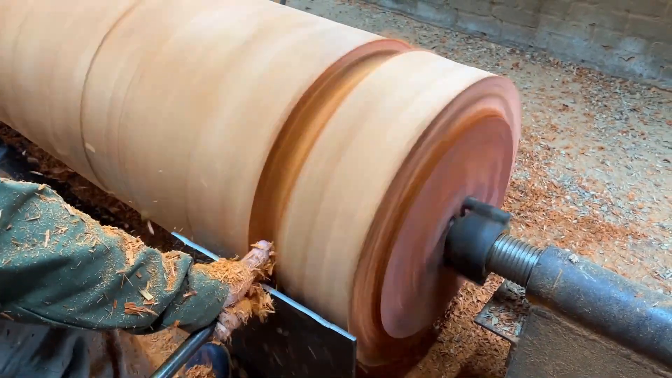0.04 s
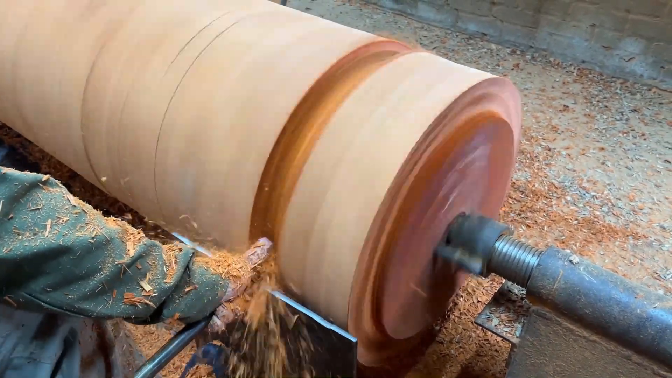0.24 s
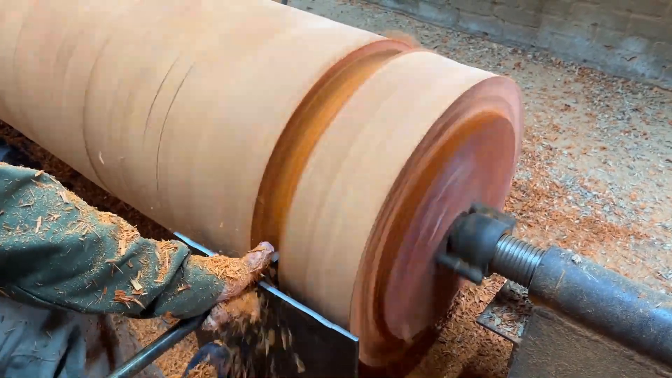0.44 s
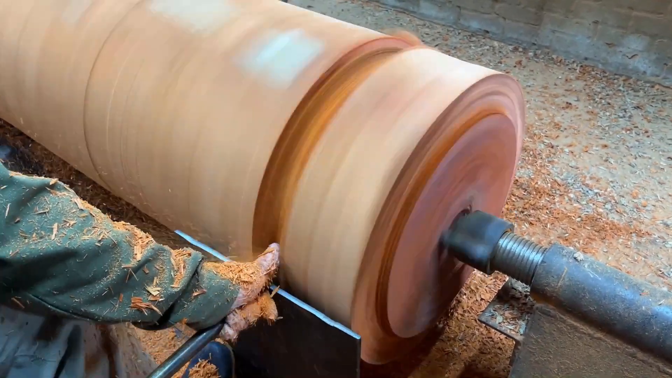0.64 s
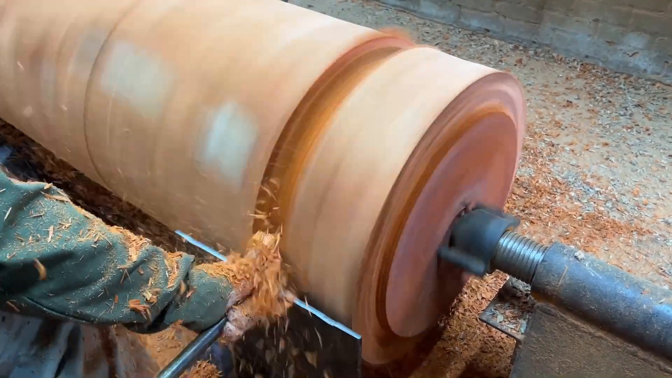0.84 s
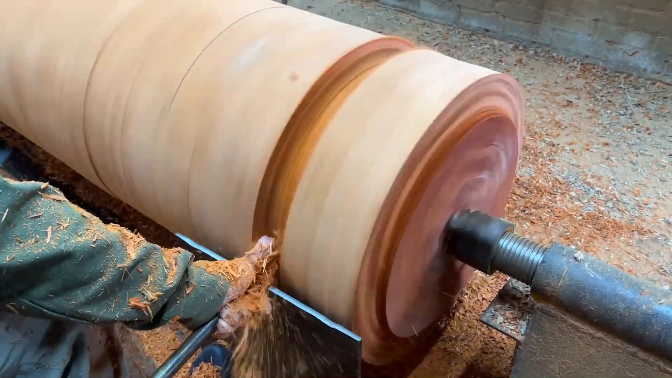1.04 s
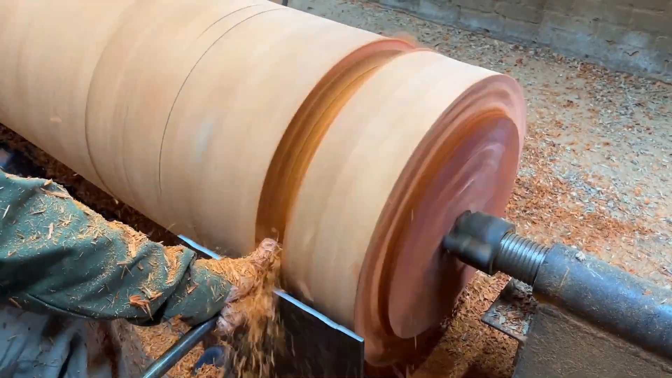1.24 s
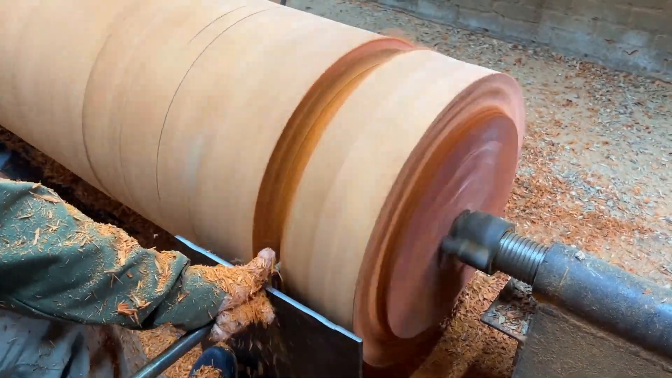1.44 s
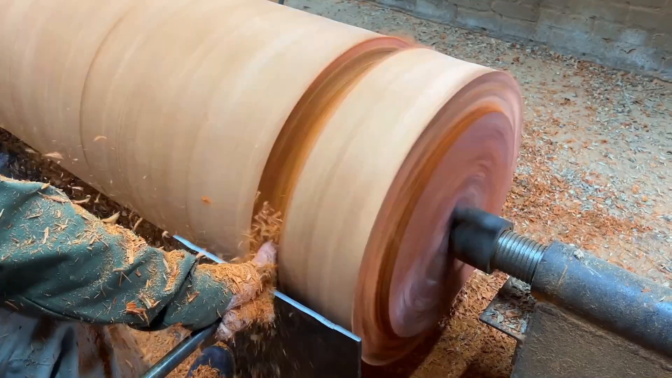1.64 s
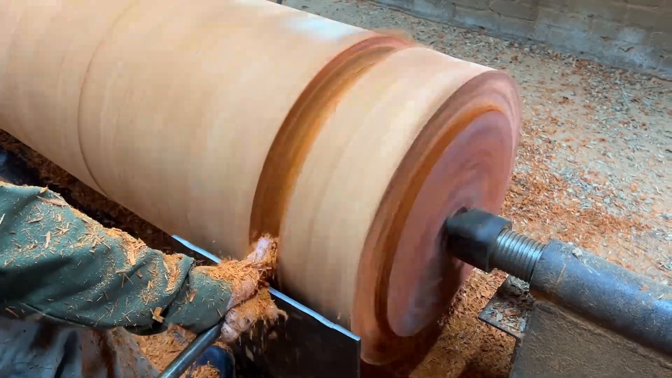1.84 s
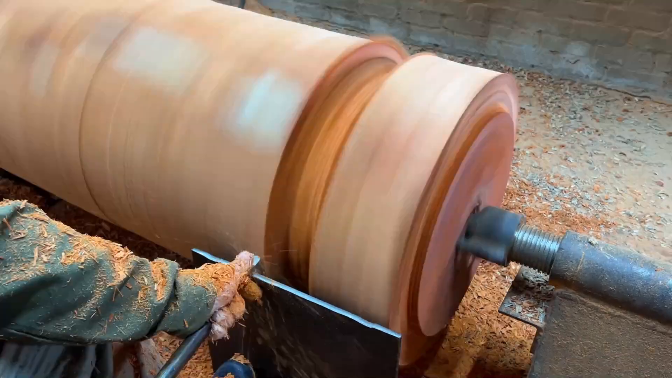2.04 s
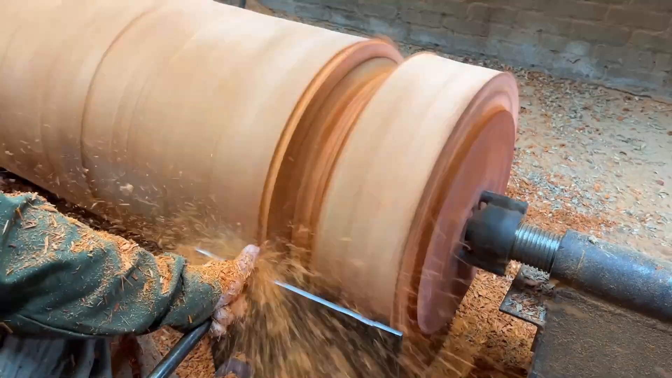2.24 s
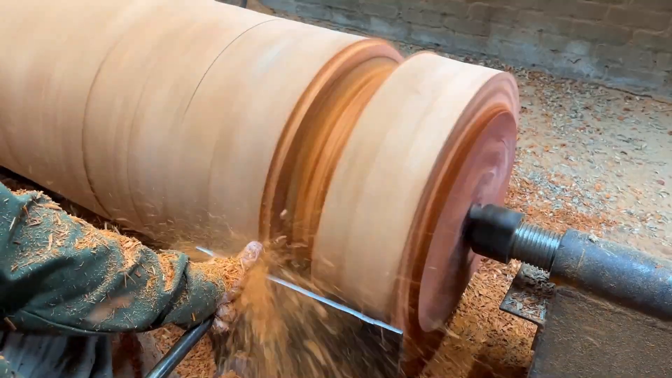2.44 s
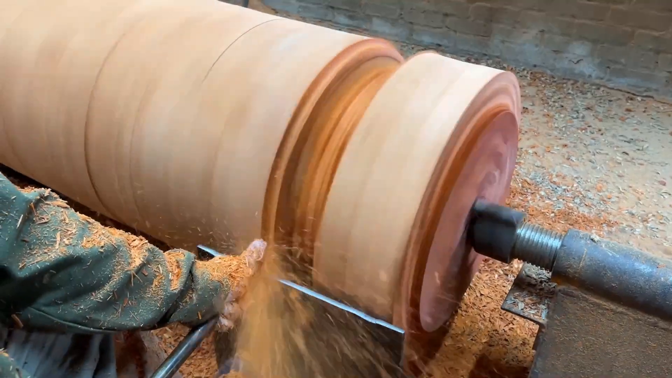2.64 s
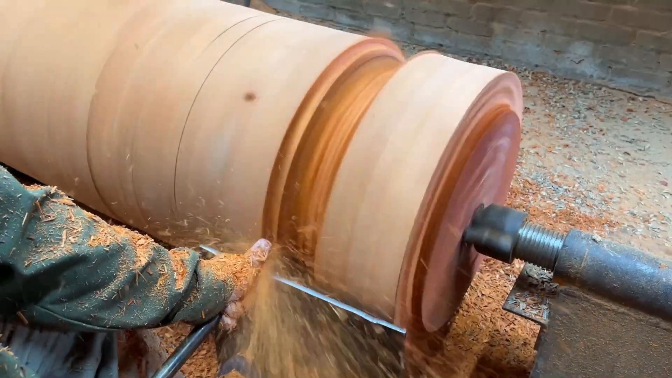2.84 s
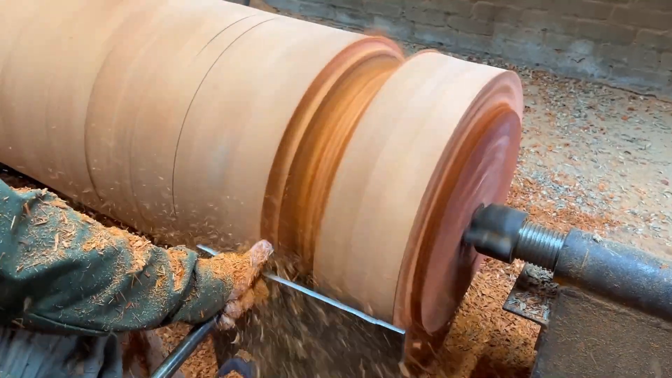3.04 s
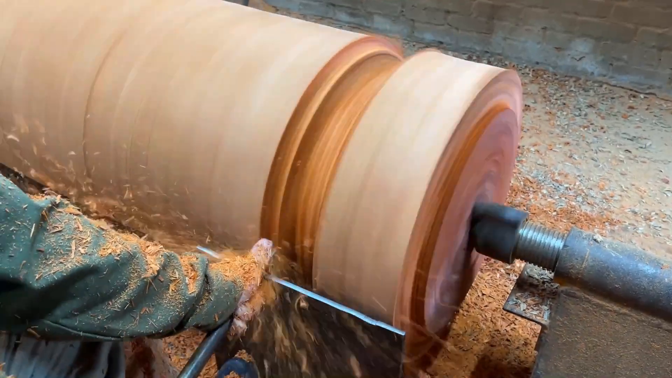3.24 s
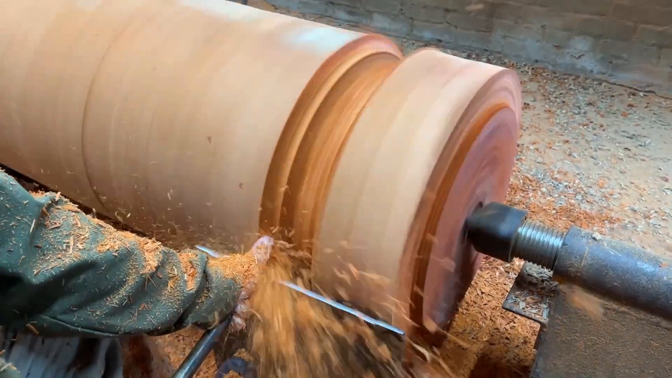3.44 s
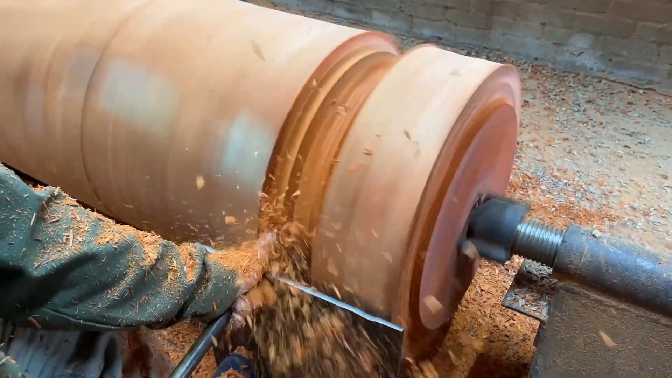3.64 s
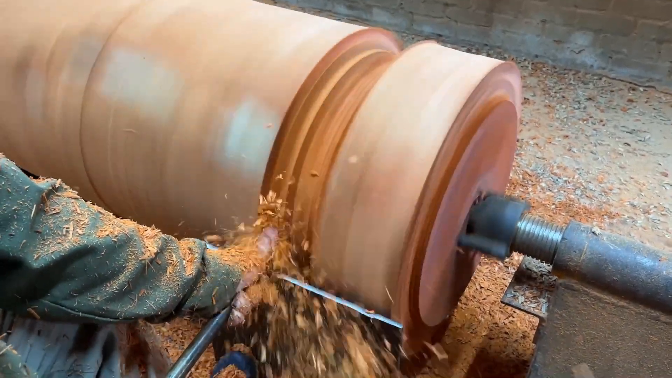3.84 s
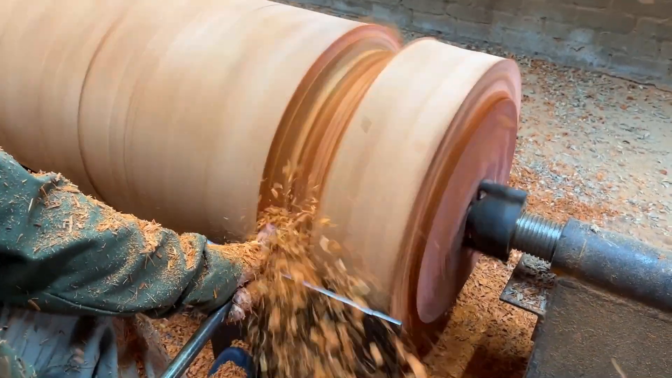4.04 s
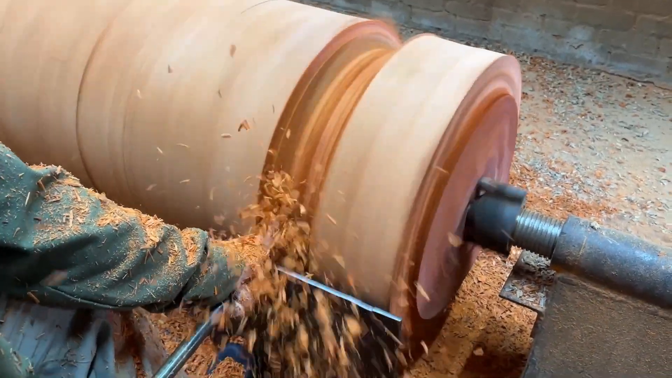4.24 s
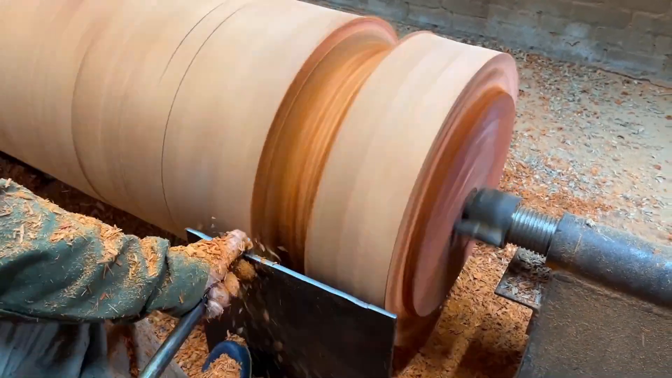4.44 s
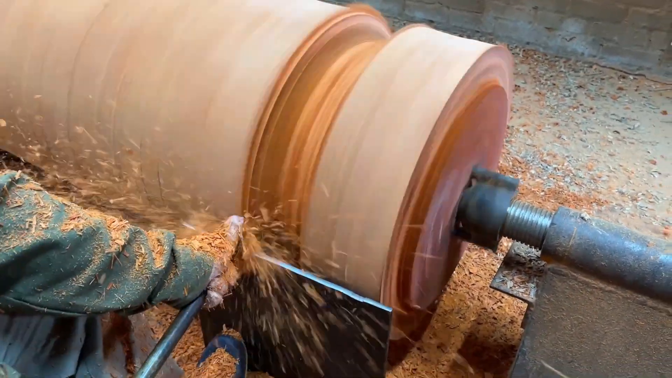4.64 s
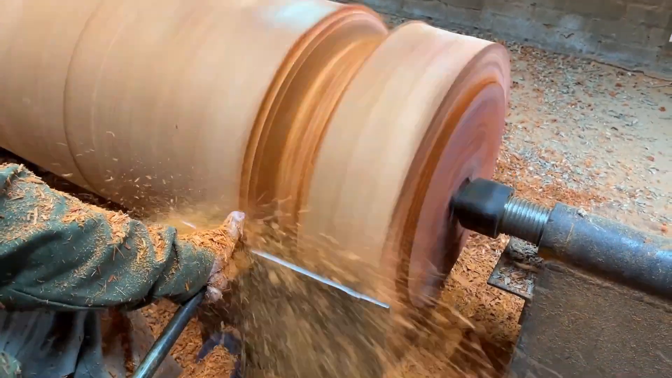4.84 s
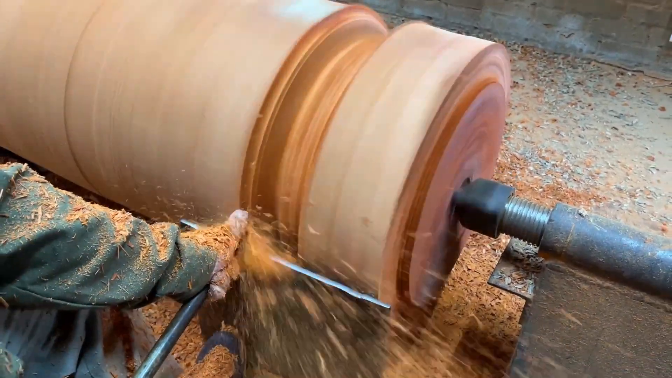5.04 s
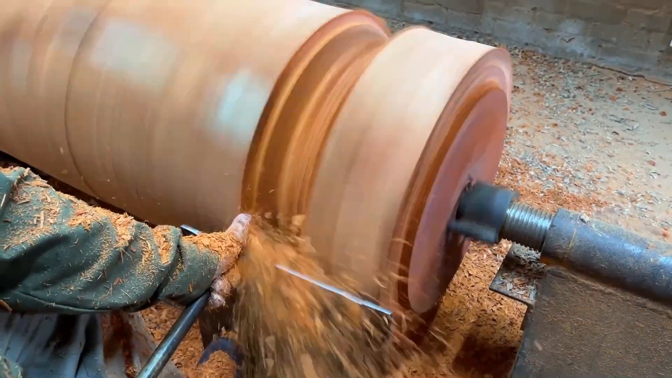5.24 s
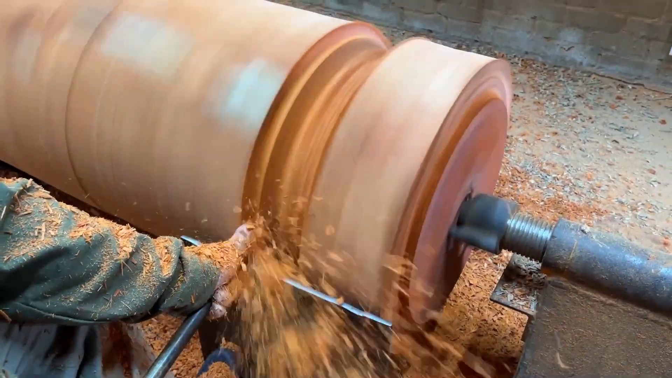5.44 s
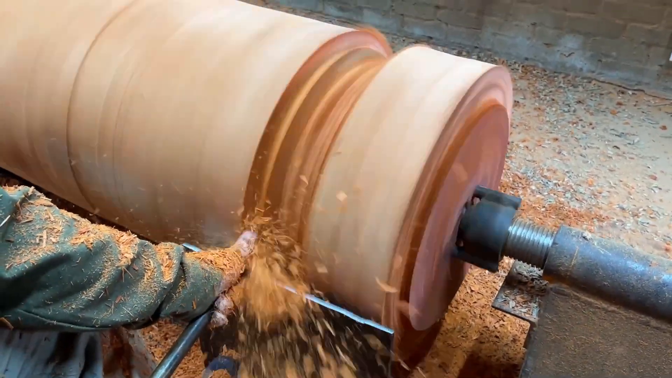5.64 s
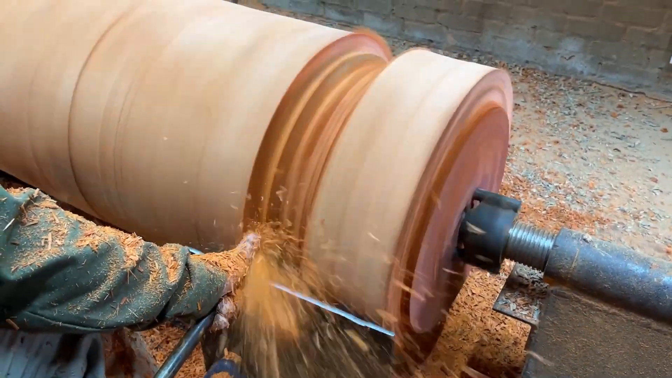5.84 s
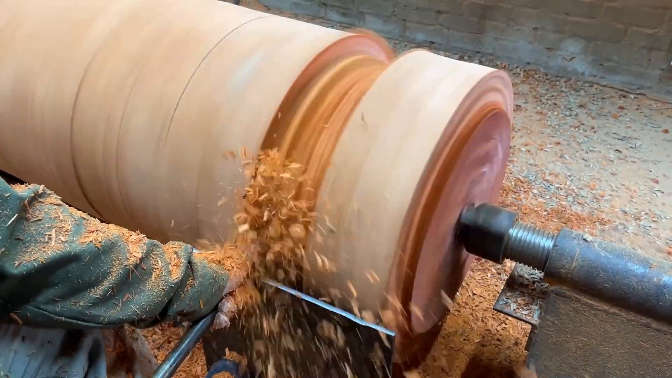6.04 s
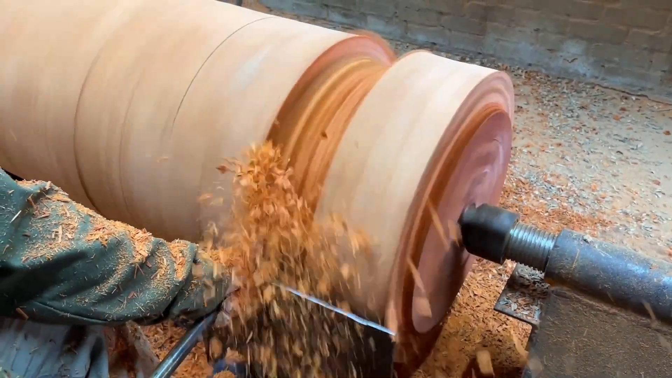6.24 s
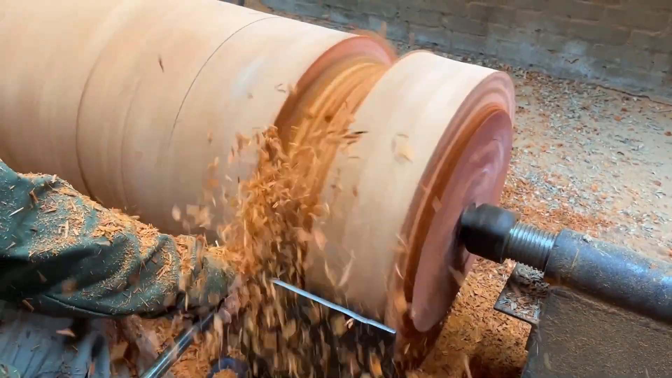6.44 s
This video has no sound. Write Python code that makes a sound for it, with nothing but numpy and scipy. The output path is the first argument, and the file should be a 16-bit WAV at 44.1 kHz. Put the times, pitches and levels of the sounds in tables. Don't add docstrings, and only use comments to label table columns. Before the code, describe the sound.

Close stereo view of woodturning in an open workshop. Five short raspy sweeps of a steel gouge on a big spinning log, with dull knocks and thin metallic whistles, separated by brief gaps of motor hum. A blink of near silence, then three long, bright, gritty plunges tear out chips, their hiss sinking in pitch as the edge digs, with quick knocks once per turn and short tool rings.

```python
import sys
import numpy as np
from scipy import signal
from scipy.fft import rfft, irfft, next_fast_len
from scipy.io import wavfile
from scipy.ndimage import uniform_filter1d

SR = 44100
rng = np.random.default_rng(int(sys.argv[2]) if len(sys.argv) > 2 else 0)


def level_to_linear(level):
    exponent = np.asarray(level, float) / 20
    return 10 ** exponent


def digitize_waveform(pressure):
    field = np.atleast_2d(pressure).T
    bounded = np.clip(field, -1, 1)
    quanta = np.round(bounded * 32767).astype(np.int16)
    wavfile.write(sys.argv[1], SR, quanta)


N = 287091
PADDED = 2 * next_fast_len(N // 2 + 1)
FINE_HZ = np.arange(PADDED // 2 + 1) * SR / PADDED
CUT_START_S, CUT_END_S = 2.09, 2.104

# (frequency [Hz], level [dB])
SHOP_SPECTRUM = [(20, -44), (90, -24), (140, -4), (400, -5.5), (850, -7), (2500, -15), (5400, -22),
                 (7000, -34), (16000, -24)]
# (time [s], level [dB])
LOW_RUMBLE = [(0.0, -63), (0.11, -75), (0.49, -67), (0.54, -71), (0.96, -56), (1.03, -75), (1.14, -59),
              (1.48, -67), (2.99, -62), (3.22, -81), (3.28, -62), (4.36, -64), (4.51, -88), (4.67, -62),
              (5.88, -63), (6.1, -80), (6.12, -70), (6.5, -70)]

# (frequency [Hz], ..)
FIRST_MODE_HZ = [(301.0, 1227.0, 1637.0, 2003.0, 2864.0, 3359.0, 3704.0, 3984.0, 5039.0, 5319.0, 5367.0, 5685.0, 6740.0, 6977.0, 7644.0, 8333.0, 8829.0, 9948.0, 10917.0, 11908.0, 12446.0, 13221.0, 14190.0, 14664.0, 15030.0)]
SECOND_MODE_HZ = [(323.0, 754.0, 1314.0, 2046.0, 2369.0, 2799.0, 3898.0, 4199.0, 4436.0, 4974.0, 5367.0, 5685.0, 6417.0, 6955.0, 7257.0, 8010.0, 8527.0, 8795.0, 9447.0, 9625.0, 10487.0, 11499.0, 11900.0, 12439.0, 12908.0, 13250.0, 13645.0, 14018.0, 14919.0, 15343.0, 15650.0)]
# (width [Hz], level over scatter [dB], left over right [dB], left lead [rad])
FIRST_MODE_SOUND = [(121, 14, -2, 0.5), (326, 15.5, -0.5, 0.77), (85, 17, 0.5, 1.65), (227.88, 9, -1.5, 1),
                    (98.148, -6, -7, -3), (282, 11.5, 6.5, 2), (86.4, 8, 10.5, 0.5), (151, 12, 6.5, 2.5),
                    (122.04, -5, 20, 5), (191.16, 5.5, -9, -3.5), (15.0, 12, 4, -5),
                    (145.8, 13, 16.3, -5.5), (87.963, -1, 31.5, 15), (237.04, -7, -31, 18),
                    (96.0, -1, 3, -5), (266.76, 13, 4, 1.5), (163.0, 9.5, -2, -1), (203.7, 8, 16.5, 10.5),
                    (248.15, -21, -4, 10), (277.78, 6.5, 0, 0), (91.667, 6, -10, -2), (226.8, 11, -1, 1.5),
                    (184.26, 12, 5, -3), (203.04, 3, -1, 0), (150.0, 2, 3, -1)]
SECOND_MODE_SOUND = [(134, 7.5, -3, 0.5), (100.44, 2.5, -1, 0.5), (398, 11, -2.5, 1),
                     (204.63, 2.6, -2, 1.7), (104.63, 1.5, 1, -1.5), (59, 7.0, -5, -0.4),
                     (200, 8.5, 0.5, -0.5), (77, -0.5, -13, -11.5), (10.1, 1, 8, 1.5),
                     (320, 4.7, 3.5, -8.5), (8, -6, -27.5, 5), (260, 5.5, 0, 13), (303, 10.5, 5, 5),
                     (42, 8, 9, -9), (140, 7, -18, -4), (88, 8, -2, -2), (98.148, 8, 18, 7),
                     (58, 12.5, 3, 0), (90, 6.5, -3, 2), (330, 9, 12.5, 2.5), (480, 11, 0.5, 2),
                     (266.3, 9.5, -2, -2.5), (90, 3, 2, 4), (168.52, 8, 8, 2.5), (110, 4, 2.3, 0.5),
                     (152.78, 17, -0.5, 1.2), (90, 9, 8, 6), (182.41, 12, 9, -6), (277.78, 3.1, 9, -2.5),
                     (100, 4, 1, -1), (200, 1, -2, -1)]
# (frequency [Hz], level [dB])
SCATTER_SPECTRA = [
    [(30, 4), (100, -11), (700, -4), (2000, -5.5), (6000, 10), (11000, 7), (13000, 4), (16000, -4)],
    [(30, 7), (100, -0.5), (700, -2), (2000, -2), (6000, 6), (11000, 3.5), (13000, 3), (16000, 4)],
]
# (frequency [Hz], width [Hz], level [dB])
GROUND_NOTCHES = [
    [(4720, 200, -10), (1850, 150, -3)],
    [(2670, 60, -4), (6860, 100, -2.5)],
]
# (frequency [Hz], level [dB])
BASS_RADIATION = [(20, -35), (50, -25), (90, -18), (160, -3), (210, -3.5), (300, -2.5)]

# (time [s], peak [dB])
KNOT_KNOCKS = [(0.065, -32.5), (0.137, -39), (0.21, -36), (0.483, -32), (0.531, -39), (0.726, -32),
               (0.773, -30), (0.9, -26.5), (0.98, -23.5), (1.033, -35), (1.085, -32), (1.148, -29),
               (1.453, -38), (1.501, -36), (1.552, -34), (1.712, -28), (1.776, -22), (1.831, -25),
               (1.908, -33), (2.057, -29), (2.073, -56), (2.086, -29)]
# (time [s], peak [dB])
LOG_KNOCKS = [(2.189, -50), (2.214, -46), (2.283, -42), (2.324, -39), (2.422, -41.5), (2.488, -40),
              (2.55, -37), (2.616, -36), (2.692, -35.5), (2.75, -34.5), (2.815, -35.5), (2.88, -34.5),
              (2.949, -37), (3.017, -38.5), (3.073, -40), (3.261, -41), (3.368, -37), (3.442, -38),
              (3.498, -40), (3.541, -47), (3.661, -41), (3.724, -48), (3.783, -41), (3.832, -38),
              (3.888, -47), (3.962, -39.5), (4.009, -45), (4.085, -46), (4.194, -50), (4.246, -49),
              (4.347, -46), (4.399, -48), (4.607, -46), (4.708, -39), (4.797, -35.5), (4.861, -40),
              (4.926, -36.5), (4.992, -41), (5.057, -42), (5.113, -34), (5.169, -39), (5.25, -44),
              (5.321, -40), (5.38, -37), (5.498, -42), (5.537, -50), (5.627, -48), (5.696, -42),
              (5.827, -48), (5.891, -42), (6.008, -45), (6.049, -38.5), (6.151, -38), (6.198, -53),
              (6.298, -44), (6.337, -41), (6.399, -41), (6.466, -42)]
# (start [s], end [s], level [dB])
SHANK_NOTES = [(0, 0.033, -42), (0.082, 0.138, -50), (0.418, 0.495, -46.5), (0.702, .76, -48),
               (0.832, 0.977, -36.5), (1.13, 1.25, -43), (1.28, 1.45, -47), (1.607, 1.947, -39.5),
               (2.54, 2.566, -44), (2.984, 3.036, -42.5), (3.266, 3.3, -46), (3.512, 3.61, -39),
               (3.655, 3.688, -46), (3.73, 3.8, -44), (3.9, 3.955, -37), (4.05, 4.4, -46),
               (4.63, 4.664, -44), (5.302, 5.55, -46), (6.085, 6.187, -40), (6.275, 6.505, -42.5)]
# (time [s], frequency [Hz], peak [dB], 60 dB decay [s])
TOOL_RINGS = [(3.07, 1300, -35, .07), (3.44, 1310, -30, .05), (3.638, 1310, -31, .06),
              (5.775, 1320, -34, .07), (6.11, 1330, -32, .07), (3.258, 1330, -33, .06),
              (3.1, 5400, -48, .3), (3.12, 4450, -48, .25), (3.245, 4500, -33, .17),
              (3.245, 7050, -36, .15), (4.42, 5367, -43, .4), (4.425, 4436, -44, .3),
              (4.58, 7050, -42, .12), (5.372, 1290, -28, .08), (5.437, 1310, -31, .07),
              (5.503, 1330, -28, .08), (5.57, 1350, -30, .09)]

# (time [s], level [dB])
FIBRE_SNAPS = [(0.0154, -37), (0.1899, -3), (0.8834, -37), (1.6277, -23), (2.592, -26), (3.244, -2),
               (3.2573, -39), (3.8222, -27), (4.133, -30), (4.581, -25), (4.97, -30), (5.0315, -25)]
# (frequency [Hz], ..)
BAND_LIMITS_HZ = [100, 2300, 6500, 11200, 16000]
# (valid from [s], reference pass [s])
HARD_GRAIN = [
    (0, .065),
    (1.52, 1.712),
]
# (frequency [Hz], depth [dB])
TURN_SWELL = [(300, 6), (1300, 11.5), (4000, 4.5), (12000, 1.5)]
# (time [s], change [dB])
EDGE_SKIPS = [(0.805, -5.5), (0.87, -2.5), (2.26, 0), (2.5, -1), (2.83, 1), (2.9, -2), (3.3, 0.5),
              (3.42, 3.5), (3.86, 0), (4.06, -1), (4.12, -2.5), (4.18, -1.5), (4.245, -2.5), (4.31, -2.5),
              (4.375, 0), (4.75, 0), (5.06, -2), (5.18, 3), (5.405, -3.5), (5.44, -4.5), (5.55, 1),
              (5.97, 1), (6.05, -3), (6.11, 0), (6.245, -4), (6.31, -3), (6.365, 0)]
# (time [s], pressure [dB], lean on the rest [dB])
SWEEP_STROKES = [
    [(0.0, -26.5, -16), (0.02, -28, -12), (0.05, -30.5, -12.5), (0.088, -34, -12.5), (0.11, -37, -7)],
    [(0.21, -39, -10), (0.252, -30.5, -10), (0.32, -30.5, -6), (0.452, -26.5, -4.5), (0.52, -34.5, -2.5)],
    [(0.67, -39, -5), (0.712, -34, -8.5), (0.892, -22, -12), (0.964, -22.5, -11), (1.0, -34.5, -8)],
    [(1.09, -37.5, -6), (1.118, -31.5, -9), (1.192, -25, -11.5), (1.428, -30, -2.5), (1.455, -31.5, -3.5)],
    [(1.57, -36.5, -2), (1.586, -32.5, -7.5), (1.724, -22.5, -10), (1.84, -25, -10), (1.965, -34, -5)],
]
# (time [s], pressure [dB], lean on the rest [dB])
CUT_OFF_SWEEP = [
    (2.066, -62, 4),
    (2.09, -52, -19),
]
# (level over pressure [dB], share of the lean [dB/dB])
SWEEP_BALANCE = [(-5, 0.42), (-2, -0.43), (-8, -0.21)]
# (time [s], pressure [dB])
PLUNGE_STROKES = [
    [(2.127, -47.5), (2.15, -41.5), (2.179, -33), (2.501, -30), (2.531, -26), (2.823, -28), (2.831, -28),
     (3.075, -24.5), (3.11, -28)],
    [(3.25, -34), (3.258, -26.5), (3.308, -22), (3.35, -29.5), (3.418, -24.5), (4.192, -26.5), (4.27, -23),
     (4.415, -29)],
    [(4.582, -44), (4.61, -31.5), (4.83, -31.5), (5.07, -25.5), (5.6, -24), (5.99, -31), (6.025, -25.5),
     (6.44, -26.5), (6.51, -31)],
]
# (time [s], frequency [Hz], level [dB])
CHIP_RIDGES = [
    [(2.1, 16800, 8), (2.5, 15500, 15), (2.8, 14600, 14), (2.92, 14400, 11), (3.15, 12800, 10),
     (3.25, 11000, 0), (3.45, 9900, 7), (3.62, 8600, 11.5), (4.45, 8300, 12), (4.56, 16400, 7),
     (5.0, 15340, 10), (5.15, 14700, 9), (5.2, 14100, 4), (5.38, 12900, 1), (5.43, 9950, 8),
     (5.72, 9200, 14), (5.88, 8580, 12.5), (6.5, 8346, 9)],
    [(2.1, 10100, 3), (3.1, 10700, 7.5), (3.25, 6800, -2), (3.7, 6960, 4), (4.15, 5900, 1),
     (4.21, 5300, 1.5), (4.45, 4970, 4), (4.56, 10200, 0), (5.15, 10500, 1.5), (5.38, 10700, 2),
     (5.45, 6700, -1.5), (6.05, 3900, -1), (6.5, 3650, 3)],
]
# (chip pitch [Hz], tear [dB], hiss [dB], edge over pressure [dB])
CHIP_BALANCE = [(8300, -2, -4.5, -9.5), (8600, -9.5, 0, -8.5), (9560, -10, -1, -7.5), (10500, -13, -4, -4),
                (13300, -11, -4.5, -2), (15020, -12.5, -8.5, 1.3), (15920, -9, -6.5, -1.5)]
# (log [dB/s], tear [dB/s], hiss [dB/s], edge [dB/s])
ATTACK = [(450, 400, 370, 210), (700, 800, 2200, 2600)]
# (log [dB/s], tear [dB/s], hiss [dB/s], edge [dB/s])
RELEASE = [(448, 490, 820, 540), (500, 450, 640, 650)]
# (log [dB], tear [dB], hiss [dB], edge [dB])
TAIL_DB, TAIL_DB_PER_S = [(-11, -12, -16, -19), (-2, -20, -18, -27)], (102, 220.0)


def in_time(rows, s):
    rows = np.transpose(rows)
    return [np.interp(s, rows[0], column) for column in rows[1:]]


def at_hz(points, hz):
    point_hz, level_db = np.transpose(points)
    return np.interp(np.log(hz + 1), np.log(point_hz), level_db)


def bell(x, centre, width):
    return np.exp(-.5 * ((x - centre) / width) ** 2)


def slow_noise(pole_hz, rows):
    r = np.exp(-2 * np.pi * pole_hz / SR)
    return signal.lfilter([1], [1, -2 * r, r * r], rng.standard_normal((rows, N + SR)))[:, SR:]


def drift(rate_hz):
    slow = slow_noise(rate_hz, 1)[0]
    return slow / slow.std()


def stereo(mid, side, alike):
    both = np.sqrt(1 + alike) * mid + np.sqrt(1 - alike) * side * [[1], [-1]]
    return both / both.std()


def strikes(events, offset_db):
    out = np.zeros(N)
    times, peaks_db = np.transpose(events)
    out[np.round(times * SR).astype(int)] = level_to_linear(peaks_db + offset_db)
    return out + 1e-18


def held(level_db, s, touch, lift, rise, fall):
    return level_db - rise * np.maximum(touch - s, 0) - fall * np.maximum(s - lift, 0)


def workshop():
    noise = rfft(rng.standard_normal((2, PADDED)))
    mid, side = irfft(noise * level_to_linear(at_hz(SHOP_SPECTRUM, FINE_HZ)))[:, :N]
    return level_to_linear(-53) * stereo(mid, side, alike=0.71)


def rumble():
    band = signal.butter(2, [30, 120], "band", fs=SR, output="sos")
    mid, side = signal.sosfilt(band, rng.standard_normal((2, N)))
    level_db = in_time(LOW_RUMBLE, np.arange(N) / SR)[0]
    return level_to_linear(level_db - 1.5) * stereo(mid, side, alike=.75)


def body(modes, direct_db, narrow=0.58):
    hz = FINE_HZ
    power = np.full((2, len(hz)), level_to_linear(2 * direct_db))
    lead_sum = np.zeros(len(hz))
    for mode_hz, width, db, pan_db, lead in modes:
        width, pan_db = max(width, 60), np.clip(pan_db, -9, 9)
        ring = level_to_linear(2 * (db + 2.5)) / (1 + (2 * (hz - mode_hz) / (narrow * width)) ** 2)
        power += ring * level_to_linear(np.array([[pan_db], [-pan_db]]))
        lead_sum += ring * lead
    mean_power = power.mean(axis=0)
    cepstrum = irfft(np.log(mean_power))
    cepstrum[len(hz):] = 0
    phase = rfft(cepstrum).imag + .5 * lead_sum / mean_power * [[1], [-1]]
    return np.sqrt(power) * np.exp(1j * phase)


def knocks(events, modes, offset_db, soft_hz, narrow):
    band = signal.butter(3, [150, soft_hz], "band", fs=SR, output="sos")
    blows = signal.sosfilt(band, strikes(events, offset_db))
    low_modes = [mode for mode in modes if mode[0] < 1500]
    return irfft(rfft(blows, PADDED) * body(low_modes, direct_db=-30, narrow=narrow))[:, :N]


def rings():
    s, out = np.arange(N) / SR, np.zeros(N)
    for at, hz, db, t60 in TOOL_RINGS:
        age = np.maximum(s - at, 0)
        swell = 1 - np.exp(-age / 0.00031)
        out += level_to_linear(db - 60 * age / t60) * swell * np.sin(2 * np.pi * hz * age)
    return out


def turn(s):
    turn_s, lag_s = .065, 0.00078
    starts, marks = np.transpose(HARD_GRAIN)
    mark = marks[np.searchsorted(starts, s, side="right") - 1]
    even = np.cos(np.pi * (s - mark - lag_s) / turn_s) ** 4
    knock_lag_s, knock_width_s, mean_knock_db = 0.0068, 0.0079, -34
    knocked = sum(level_to_linear(.5 * (db - mean_knock_db)) * bell(s, at + knock_lag_s, knock_width_s)
                  for at, db in LOG_KNOCKS)
    swell = np.where(s < CUT_END_S, even, knocked)
    return swell - swell.mean()


def singing(s):
    rise, falls = 306, (87, 250.0)
    return sum(level_to_linear(held(db, s, start, end, rise, falls[start > CUT_START_S]))
               for start, end, db in SHANK_NOTES)


def shank():
    s = np.arange(N) / SR
    first = s < CUT_END_S
    real, imaginary = slow = slow_noise(34.0 / 2, 2)
    waver = np.where(first, 1.3, .25) + (real + 1j * imaginary) / slow.std()
    tone = (waver * np.exp(2j * np.pi * np.where(first, 2864, 2790) * s)).real
    coarse = s[::32]
    swell_db = -1.5 + 4.1 * (coarse > CUT_END_S) * turn(coarse)
    gain = np.interp(s, coarse, level_to_linear(swell_db) * singing(coarse))
    return gain * tone / np.where(first, 1.9, 1.1) * level_to_linear(np.array([[.6], [-.6]]))


def snaps():
    median_db = np.median(np.array(FIBRE_SNAPS)[:, 1])
    decay = np.exp(-1 / (0.00084 * SR))
    return signal.lfilter([1], [1, -decay], 0.75 * strikes(FIBRE_SNAPS, -median_db))


def fibres():
    grains_per_s, spread_db = 12000, 2.0
    sizes = level_to_linear(spread_db * np.minimum(rng.exponential(1, (3, N)), 5)) * rng.standard_normal((3, N))
    grains = sizes * (rng.random((3, N)) < grains_per_s / SR)
    clumps = level_to_linear(0.39 * drift(220) + 0.7 * drift(41) + 0.099 * drift(15.3))
    grains = grains * clumps * (1 + snaps())
    return grains / grains.std()


def patches(shape, depth_db, bins=7, frames=25):
    field = uniform_filter1d(rng.standard_normal(shape), size=bins, axis=0)
    field = uniform_filter1d(field, size=frames, axis=1)
    return level_to_linear(depth_db * field / field.std())


def streaks(x):
    hz, s, frames = signal.stft(x, SR, nperseg=1024)
    field = patches(frames.shape[1:], 2.2, bins=3, frames=9)
    field = np.where(hz[:, None] > 1800, field / np.sqrt(np.mean(field ** 2)), 1)
    return signal.istft(frames * field, SR, nperseg=1024)[1][:, :N]


def slack(s):
    return sum(db * bell(s, at, 0.0072) for at, db in EDGE_SKIPS)


def sweep_bands(rows, s):
    pressure, lean = in_time(rows, s)
    mean_lean_db = -8
    upper = [db + share * (lean - mean_lean_db) for db, share in SWEEP_BALANCE]
    return pressure + slack(s) + np.array([lean] + upper)


def plunge_bands(rows, s):
    pressure = in_time(rows, s)[0] + slack(s)
    chip_hz = in_time(CHIP_RIDGES[0], s)[0]
    upper = pressure + np.array(in_time(CHIP_BALANCE, chip_hz))
    log_db = -41.5 + 0.48 * (pressure + 28)
    return np.vstack([log_db, upper])


def contact(strokes, bands, setup, s):
    attack, release, tail = (np.array(table[setup])[:, None] for table in (ATTACK, RELEASE, TAIL_DB))
    power = level_to_linear(-180)
    for rows in strokes:
        touch, lift = rows[0][0], rows[-1][0]
        db = bands(rows, np.clip(s, touch, lift))
        power = power + level_to_linear(2 * held(db, s, touch, lift, attack, release))
        power = power + level_to_linear(2 * held(db + tail, s, lift, lift, release, TAIL_DB_PER_S[setup]))
    return 10 * np.log10(power)


def cutting(grains, strokes, bands, setup, modes, chips, direct_db, swell, patchy_db):
    hz, s, frames = signal.stft(grains, SR, nperseg=256)
    band_db = contact(strokes, bands, setup, s)
    dips = level_to_linear(sum(db * bell(FINE_HZ, at, width) for at, width, db in GROUND_NOTCHES[setup]))
    direct = dips * body(modes, direct_db)
    scatter = dips * level_to_linear(at_hz(SCATTER_SPECTRA[setup], FINE_HZ))
    heard = np.abs(direct.mean(axis=0)) ** 2 + scatter ** 2 / 2
    heard = np.interp(hz, FINE_HZ, uniform_filter1d(heard, size=N // 256))

    shape = level_to_linear(at_hz(BASS_RADIATION, hz))[:, None] * patches(frames.shape[1:], patchy_db)
    for ridge in chips:
        chip_hz, chip_db = in_time(ridge, s)
        shape = shape * level_to_linear(chip_db * bell(hz[:, None], chip_hz, 670.0))

    band = np.digitize(hz, BAND_LIMITS_HZ[1:-1])
    power = shape ** 2 * heard[:, None]
    need_db = []
    for k, db in enumerate(band_db):
        inside = (band == k) & (hz < BAND_LIMITS_HZ[-1])
        need_db.append(db - 10 * np.log10(power[inside].sum(axis=0) / len(hz)))
    blend = uniform_filter1d(np.eye(len(band_db))[band], size=9, axis=0, mode="nearest")
    level = level_to_linear(blend @ np.array(need_db) + swell * np.outer(at_hz(TURN_SWELL, hz), turn(s)))
    coloured = signal.istft(frames * shape * level, SR, nperseg=256)[1][:, :N]
    spectra = rfft(coloured, PADDED)
    return streaks(irfft(spectra[0] * direct + spectra[1:] * scatter)[:, :N])


def scene():
    s, grains = np.arange(N) / SR, fibres()
    first_modes = np.column_stack([FIRST_MODE_HZ[0], FIRST_MODE_SOUND])
    second_modes = np.column_stack([SECOND_MODE_HZ[0], SECOND_MODE_SOUND])
    shop, ring = workshop(), shank() + rings()

    sweeps = cutting(grains, SWEEP_STROKES + [CUT_OFF_SWEEP], sweep_bands, 0, first_modes, [],
                     direct_db=-26.0, swell=0.069, patchy_db=1.9)
    knots = knocks(KNOT_KNOCKS, first_modes, offset_db=30.0, soft_hz=472, narrow=0.24)
    first = level_to_linear(0.55) * sweeps + knots + ring + level_to_linear(4.5) * shop

    plunges = cutting(grains, PLUNGE_STROKES, plunge_bands, 1, second_modes, CHIP_RIDGES,
                      direct_db=-3.5, swell=0.41, patchy_db=1.3)
    late_knocks = np.add(LOG_KNOCKS, [.003, 0])
    wobble = knocks(late_knocks, second_modes, offset_db=38.0, soft_hz=398, narrow=0.33)
    second = level_to_linear(0.02) * plunges + wobble + ring + shop

    setups = first * (s < CUT_START_S) + second * (s > CUT_END_S)
    return setups + level_to_linear(-49) * shop + rumble()


def top_cut(x):
    return signal.sosfilt(signal.butter(12, 15900, fs=SR, output="sos"), x)


def record(dry):
    top = signal.ellip(16, .5, 75, 15740, fs=SR, output="sos")
    rounded = 0.59 * np.tanh(dry / 0.62)
    return top_cut(signal.sosfilt(top, rounded))


dry = scene()
out = record(dry)
digitize_waveform(out)
```